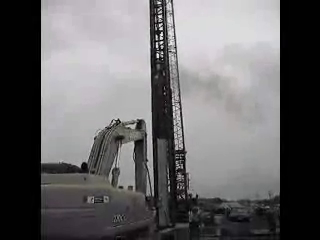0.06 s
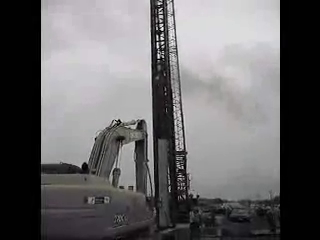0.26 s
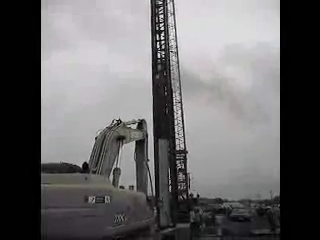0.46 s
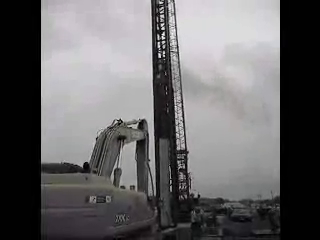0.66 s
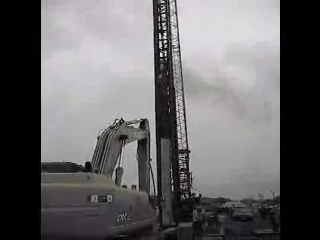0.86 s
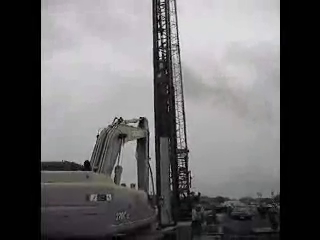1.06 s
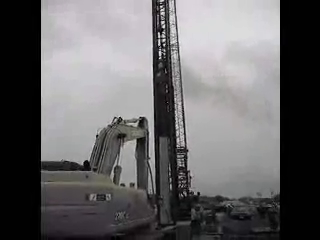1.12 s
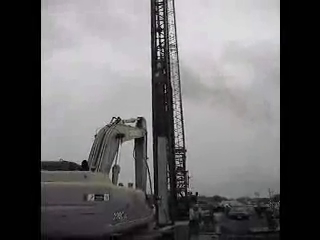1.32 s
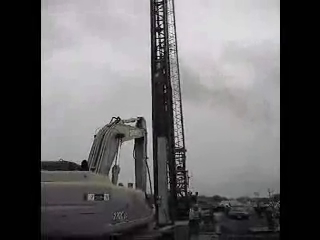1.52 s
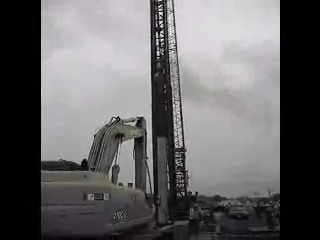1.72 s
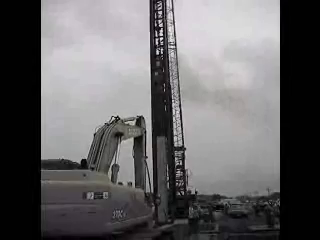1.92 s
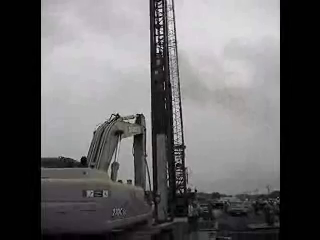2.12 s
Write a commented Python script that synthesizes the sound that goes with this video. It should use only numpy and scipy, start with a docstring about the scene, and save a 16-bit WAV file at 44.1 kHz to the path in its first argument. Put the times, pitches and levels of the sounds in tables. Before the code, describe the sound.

A diesel pile hammer strikes a steel pile at about 0.2 and 1.5 seconds. Light rattling leads into each blow; then a harsh crack, low thud and clangy midrange ring burst out, with dense metal clatter stopping short near 0.4 and fading unevenly by 0.8. Between blows, a quiet engine idles with faint whine and flickering hiss. The second clang decays until 2.15. Small outdoor microphone, dull treble, overloaded peaks.

```python
"""A diesel hammer strikes a steel pile twice: steel modes ring, with a noise crack and a low thud.
Hammer and lattice clatter in surges that stop short, as many small resonators knocked at random
over a noise roar; a lighter rattle runs up to each blow. An idling engine adds steady tones
and chuffing noise, a low noise rumble swells and sinks, and a narrow band of treble hiss flickers.
A small microphone dulls it all, and the blows overload it."""
import sys
import numpy as np
from scipy import signal
from scipy.fft import rfft, irfft
from scipy.io import wavfile

SR = 44100
rng = np.random.default_rng(int(sys.argv[2]) if len(sys.argv) > 2 else 0)


def file_out(sig):
    """Save sig as 16-bit WAV at sys.argv[1]."""
    # one column per channel
    cols = np.atleast_2d(sig).T
    # limit, then scale
    lim = np.clip(cols, -1, 1)
    pcm = np.round(lim * 32767).astype(np.int16)
    wavfile.write(sys.argv[1], SR, pcm)


def ratio_of_db(decibels):
    """Turn decibels (scalar or array-like) into linear amplitude factors; 0 dB maps to 1."""
    return 10 ** (np.asarray(decibels, float) / 20)


N = 94815  # length in samples


def evened(x):
    """Scales a sound to rms 1."""
    return x / np.sqrt(np.mean(x ** 2) + 1e-20)


def read(points, hz):
    """Reads a table over frequency, straight lines on a log frequency axis."""
    f, value = np.transpose(points)
    return np.interp(np.log(hz + 1), np.log(f + 1), value)


def along(curve):
    """Draws a table over time as straight lines, one value per sample."""
    s, value = np.transpose(curve)
    return np.interp(np.arange(N) / SR, s, value)


def coloured(x, spectrum):
    """Filters x by a spectrum in dB per Hz, then sets it to rms 1."""
    gain = ratio_of_db(read(spectrum, np.fft.rfftfreq(len(x), 1 / SR)))
    return evened(irfft(rfft(x) * gain, len(x)))


def wander(rate_hz, count):
    """Slow random curves, rms 1: noise that falls away above rate_hz."""
    z = rfft(rng.standard_normal((count, N)))
    z = z / (1 + (np.fft.rfftfreq(N, 1 / SR) / rate_hz) ** 4)
    return evened(irfft(z, N))


# Clatter before, between and after the blows: start_s [s], level_db [dB, before BOOST_DB],
# treble_db [dB, treble against the rest; TREBLE_USUAL_DB leaves the colour as it is]
CLATTER_LEVELS = [
    [(0.0, -38, -29), (0.054, -31.5, -23), (0.064, -29, -38), (0.082, -39, -12), (0.102, -32, -33),
     (0.114, -31.5, -8), (0.158, -37.5, -8), (0.164, -32, -8), (0.202, -32, -12), (0.212, -21, 9)],
    [(0.218, -10.5, -14), (0.3, -14, -14), (0.354, -17.5, -3), (0.416, -20.5, -10.5), (0.43, -29.5, -19),
     (0.454, -23, -12.5), (0.64, -35, -17), (0.668, -28.5, -7), (0.692, -32, -42), (0.808, -44, -9),
     (0.86, -31.5, -35), (0.88, -44, -21), (1.142, -42.5, -12), (1.16, -35, -26), (1.236, -34, -26),
     (1.25, -39.5, -10), (1.296, -30.5, -8), (1.306, -36, -21), (1.38, -35.5, -6), (1.43, -35.5, -20),
     (1.468, -29, -5), (1.472, -19, -4)],
    [(1.479, -9.5, -10), (1.485, -10.5, -10.5), (1.583, -17.5, -7.5), (1.617, -17.5, -3),
     (1.657, -23.5, -18.5), (1.671, -19.5, -2.5), (1.685, -22.5, -14), (1.757, -25.5, -7.5),
     (1.779, -26.5, -27), (1.795, -26.5, -6), (1.851, -35, -18.5), (1.877, -30.5, -33), (1.927, -31, -10),
     (1.975, -45, -15), (2.045, -33.5, -21), (2.091, -48, -2), (2.123, -44, -9), (2.15, -41.5, -24)],
]
# Colour of hard clatter, and of the crack of a blow: pitch_hz [Hz], level_db [dB per Hz]
HARD_COLOUR = [(120, -43), (200, -12.5), (563, -10.5), (620, -9.5), (774, -2.5), (983, -8.5), (1030, -12),
               (2360, -9.5), (2900, -12), (3460, -7), (4840, -18.5), (5240, -23.5), (5850, -24),
               (9000, -67.5), (11700, -79), (19800, -120)]
# Colour of light rattle: pitch_hz [Hz], level_db [dB per Hz]
LIGHT_COLOUR = [(180, -40), (300, -11.5), (327, -19), (473, -5), (647, -3), (790, -3.5), (1020, -8),
                (1500, -11.5), (3100, -7.5), (4740, -20.5), (5240, -23), (6970, -30), (9000, -43.5),
                (11700, -85), (19800, -120)]
# Distinct ringing against unpitched roar: pitch_hz [Hz], ringing_share [0-1 of the power]
RINGING_SHARE = [(300, 0.34), (1200, 0.36), (2500, 0.46), (4000, 0.42), (5000, 0.76), (6200, 0.75),
                 (6600, 0)]
LIGHT_DB, HARD_DB, BOOST_DB = -27, -16, 3  # table levels where the colour is all light, all hard
TREBLE_FROM_HZ, TREBLE_USUAL_DB = 4250, -12  # above this the treble follows its own level
PARTS, LOW_HZ, HIGH_HZ = 220, 200, 8800
KNOCKS_PER_S, KNOCK_SPREAD_DB = 9, 5  # knocks on each part
POLE_T60_S = 0.081  # decay of each of a part's two resonators


def knocked_parts():
    """Loose steel parts, each knocked at random; two equal resonators in a row make each ring."""
    rings = np.zeros(N)
    r = ratio_of_db(-60 / POLE_T60_S / SR)
    for k in range(PARTS):
        hz = LOW_HZ + (HIGH_HZ - LOW_HZ) * (k + rng.random()) / PARTS
        luck = rng.random(N)
        hit = luck < KNOCKS_PER_S / SR
        # the rarer the draw, the harder the knock
        rarity = np.maximum(luck[hit] * SR / KNOCKS_PER_S, .02)
        knocks = np.zeros(N)
        knocks[hit] = ratio_of_db(-KNOCK_SPREAD_DB * np.log(rarity))
        turn = 2 * np.pi * hz / SR
        pole = [1, -2 * r * np.cos(turn), r * r]
        ring = signal.lfilter([1], pole, signal.lfilter([1], pole, knocks))
        rings += ring * np.sin(turn) ** 2  # evens low and high parts
    return rings


def clatter():
    """Hammer and lattice: knocked parts ring briefly over a roar, harder in colour when loud."""
    hz = np.fft.rfftfreq(N, 1 / SR)
    share = np.clip(read(RINGING_SHARE, hz), 0, 1)
    # the rings fill only the range up to HIGH_HZ, so match their density to the noise
    ringing = np.sqrt(share * HIGH_HZ / hz[-1]) * rfft(evened(knocked_parts()))
    roar = np.sqrt(1 - share) * rfft(rng.standard_normal(N))
    raw = irfft(ringing + roar, N)

    rows = np.vstack(CLATTER_LEVELS)
    level_db, treble_db = along(rows[:, :2]), along(rows[:, ::2])
    hard = np.clip((level_db - LIGHT_DB) / (HARD_DB - LIGHT_DB), 0, 1)
    mix = hard * coloured(raw, HARD_COLOUR) + (1 - hard) * coloured(raw, LIGHT_COLOUR)
    treble = irfft(rfft(mix) * (hz > TREBLE_FROM_HZ), N)
    body = mix - treble
    return ratio_of_db(level_db + BOOST_DB) * (body + ratio_of_db(treble_db - TREBLE_USUAL_DB) * treble)


# Flickering treble band: start_s [s], level_db [dB rms]
FLICKER_LEVELS = [(0.0, -46), (0.15, -49), (0.17, -37), (0.3, -51), (0.35, -51), (0.38, -35), (0.39, -38),
                  (0.41, -24), (0.42, -27), (0.44, -62), (0.45, -34.5), (0.6, -43), (0.62, -59),
                  (0.66, -40), (0.69, -50), (0.72, -39), (0.74, -56), (0.81, -61), (0.84, -43.5),
                  (0.89, -60.5), (1.14, -57), (1.18, -43.5), (1.36, -51.5), (1.38, -69), (1.4, -39),
                  (1.44, -46.5), (1.48, -35), (1.53, -71), (1.62, -44), (1.63, -50), (1.65, -78),
                  (1.66, -57), (1.72, -36), (1.75, -50), (1.77, -37.5), (1.83, -45), (1.84, -67),
                  (1.87, -40.5), (2.01, -60), (2.02, -47), (2.05, -42), (2.06, -70), (2.13, -58),
                  (2.15, -47.5)]
FLICKER_HZ, FLICKER_WIDTH_HZ = 6817, 1000  # centre and full width


def flicker():
    """A sharp-edged band of noise in the treble comes and goes."""
    offset_hz = abs(np.fft.rfftfreq(N, 1 / SR) - FLICKER_HZ)
    band = rfft(rng.standard_normal(N)) * (offset_hz < FLICKER_WIDTH_HZ / 2)
    return ratio_of_db(along(FLICKER_LEVELS)) * evened(irfft(band, N))


# Multiples of the firing rate: multiple [-], level_db [dB rms]
FIRING_ORDERS = [(1, -45.5), (2, -44.5), (3, -66.5), (4, -49.5)]
# Gear whines: pitch_hz [Hz], level_db [dB rms]
GEAR_WHINES = [(712, -48.5), (1258, -50), (1426, -47.5), (2853, -59.5), (5450, -62)]
# Colour of the engine roar: pitch_hz [Hz], level_db [dB per Hz]
ROAR_COLOUR = [(15, -56), (25, -24), (48, 0.5), (92, -2), (120, 3), (254, -3.5), (315, -5.5), (1410, -4.5),
               (2020, -20.5), (5440, -21), (8000, -62), (10400, -76), (17600, -120)]
FIRING_HZ, ROAR_DB = 63.24, -36.5
WAVER, CHUFF = .006, 0.19  # rms share of speed that wanders, depth of the chuff


def engine():
    """Firing tones and gear whines waver with engine speed; noise chuffs with each firing."""
    t = np.cumsum(1 + WAVER * wander(2.92, count=1)[0]) / SR  # time as the engine turns
    lines = [(k * FIRING_HZ, db) for k, db in FIRING_ORDERS] + GEAR_WHINES
    tones = sum(np.sqrt(2) * ratio_of_db(db) * np.sin(2 * np.pi * (hz * t + rng.random()))
                for hz, db in lines)
    chuffs = 1 + CHUFF * np.sin(2 * np.pi * FIRING_HZ * t)
    roar = coloured(rng.standard_normal(N) * chuffs, ROAR_COLOUR)
    return tones + ratio_of_db(ROAR_DB) * roar


# Low rumble: start_s [s], level_db [dB, before RUMBLE_DB]
RUMBLE_LEVELS = [(0.0, -48), (0.06, -26.5), (0.08, -44.5), (0.22, -18.5), (0.36, -35.5), (0.37, -33.5),
                 (0.81, -45), (0.84, -65), (1.06, -51), (1.2, -28.5), (1.41, -39), (1.48, -21),
                 (1.53, -19.5), (1.54, -39), (1.78, -28), (1.81, -42.5), (2.11, -52), (2.15, -64)]
# Colour of the rumble: pitch_hz [Hz], level_db [dB per Hz]
RUMBLE_SPECTRUM = [(10, -30), (25, -21), (60, -2.5), (150, -2), (280, -4), (400, -26), (800, -53)]
RUMBLE_DB = -5.5  # added to every rumble level


def rumble():
    """Low noise swells and sinks."""
    noise = coloured(rng.standard_normal(N), RUMBLE_SPECTRUM)
    return ratio_of_db(along(RUMBLE_LEVELS) + RUMBLE_DB) * noise


# Hammer blows: start_s [s], strength_db [dB, added to ring, thud and crack]
HAMMER_BLOWS = [(.216, -17.5), (1.4766, -17)]
# Modes of the ringing steel: pitch_hz [Hz], level_db [dB, before blow strength], t60_s [s]
STEEL_MODES = [(809, -5, 1.82), (765, -15.5, 0.26), (822, -4, .3), (833, -0.5, 0.4), (941, 3, 0.48),
               (1666, -13, .3), (2365, -10.5, .25), (2480, -22, 0.56), (2744, -21, 0.66),
               (2960, -14.5, 0.61), (3060, -43, 0.4), (3377, 16.5, 0.17), (3430, -17.5, 0.45),
               (3280, -26, 0.68), (3820, -18, 0.35), (4900, -55.5, 0.29), (5940, 7.5, 0.1)]
# Colour of the thud: pitch_hz [Hz], level_db [dB per Hz]
THUD_COLOUR = [(60, -21), (120, 2), (250, 10), (500, 2), (900, 34), (2000, -55.5)]
THUD_DB, THUD_T60_S = -5.5, 0.45
CRACK_DB, CRACK_T60_S = 4.5, 0.074
SWELL_S = 0.014  # time constant as ring and thud build
BEAT_HZ, BEAT_DEPTH = 23, .3  # the ring wobbles at random as close modes beat


def blows():
    """Each blow rings the same decaying steel modes, with a short noise crack and a low thud."""
    out, t = np.zeros(N), np.arange(N) / SR
    for start_s, strength_db in HAMMER_BLOWS:
        u = np.maximum(t - start_s, 0)  # time since the blow
        beats = 1 + BEAT_DEPTH * wander(BEAT_HZ, count=len(STEEL_MODES))
        phases = rng.random(len(STEEL_MODES))
        ring = sum(ratio_of_db(db - 60 * u / t60) * beat * np.sin(2 * np.pi * (hz * u + phase))
                   for (hz, db, t60), beat, phase in zip(STEEL_MODES, beats, phases))
        thud_noise = coloured(rng.standard_normal(N), THUD_COLOUR)
        thud = ratio_of_db(THUD_DB - 60 * u / THUD_T60_S) * thud_noise
        crack_noise = coloured(rng.standard_normal(N), HARD_COLOUR) * (t >= start_s)
        crack = ratio_of_db(CRACK_DB - 60 * u / CRACK_T60_S) * crack_noise
        swell = 1 - np.exp(-u / SWELL_S)
        out += ratio_of_db(strength_db) * (swell * (ring + thud) + crack)
    return out


def scene():
    """All sources summed into one channel."""
    return (clatter() + flicker() + engine() + rumble() + blows())[None]


def top_cut(x):
    """Nothing passes above the cut-off."""
    return signal.sosfilt(signal.butter(12, 15730, fs=SR, output="sos"), x)


MIC_HZ = 8600  # top of the microphone's band
CLIP_DB, KNEE = -2.7, 30  # overload ceiling; a higher knee bends more sharply


def record(dry):
    """The microphone's low-pass band, then overload that flattens peaks with a hard knee."""
    mic = signal.firwin(301, MIC_HZ, window=("kaiser", 9), fs=SR)
    heard = signal.oaconvolve(dry, mic[None], "same")
    overloaded = heard / (1 + np.abs(heard / ratio_of_db(CLIP_DB)) ** KNEE) ** (1 / KNEE)
    return top_cut(overloaded)


dry = scene()
out = record(dry)
file_out(out)
```